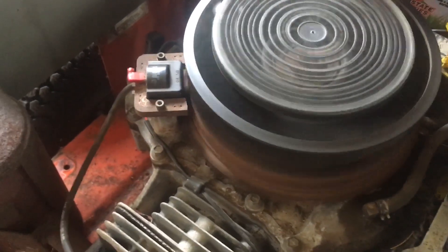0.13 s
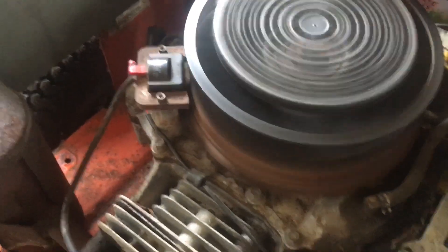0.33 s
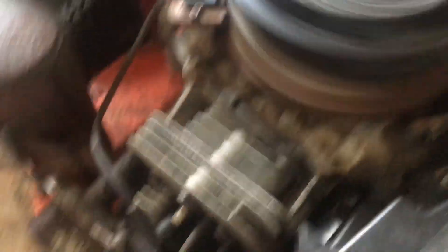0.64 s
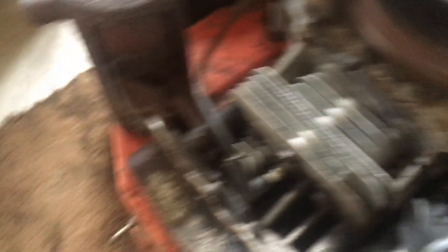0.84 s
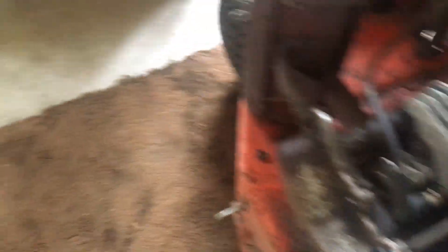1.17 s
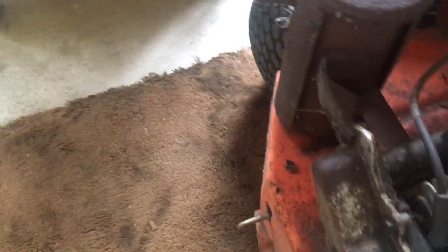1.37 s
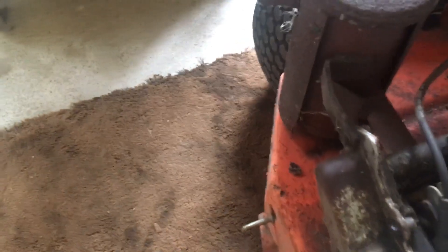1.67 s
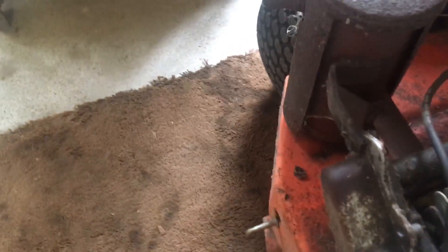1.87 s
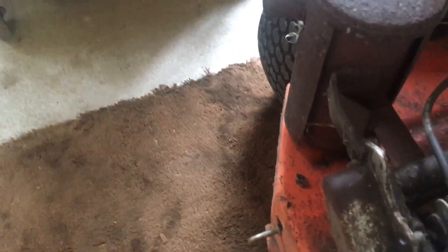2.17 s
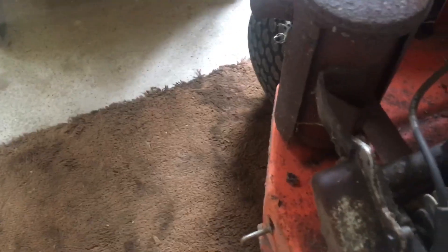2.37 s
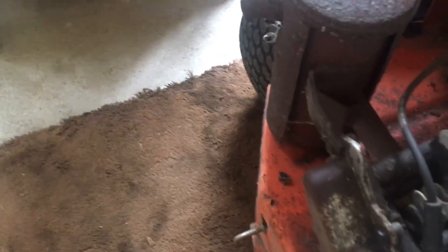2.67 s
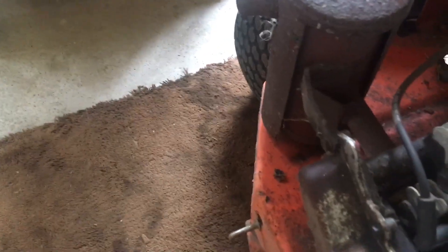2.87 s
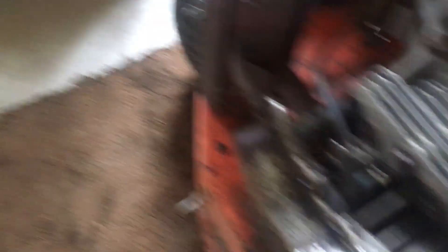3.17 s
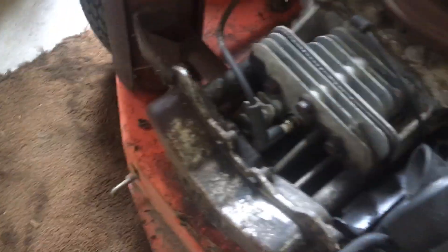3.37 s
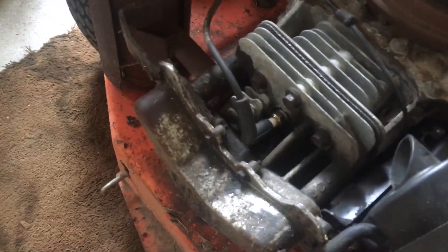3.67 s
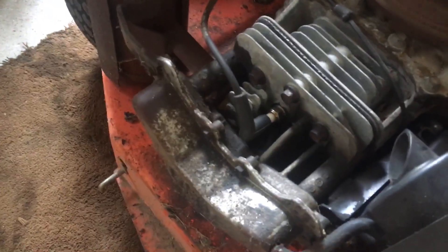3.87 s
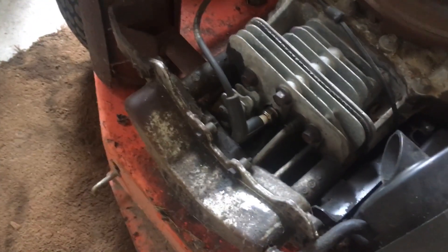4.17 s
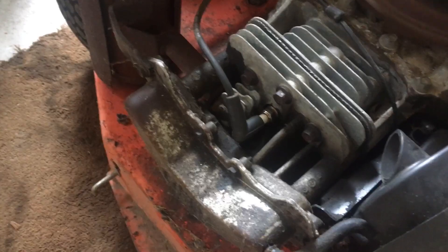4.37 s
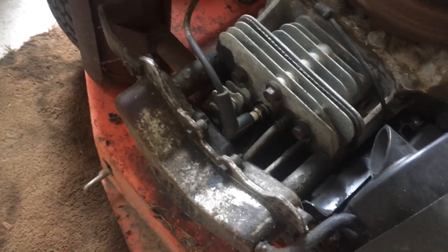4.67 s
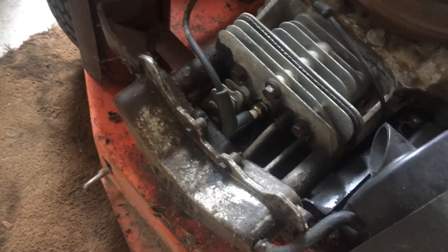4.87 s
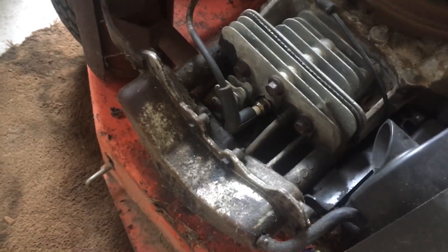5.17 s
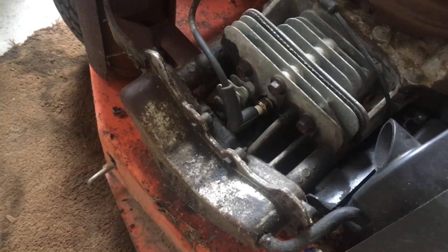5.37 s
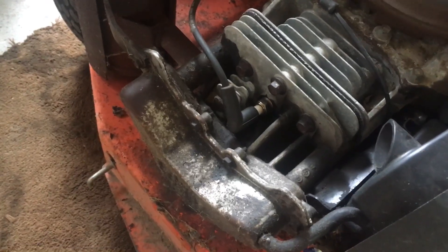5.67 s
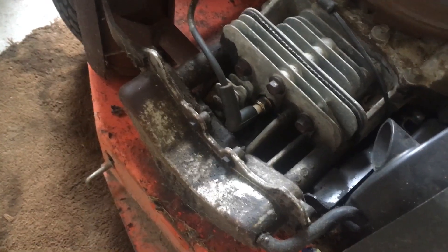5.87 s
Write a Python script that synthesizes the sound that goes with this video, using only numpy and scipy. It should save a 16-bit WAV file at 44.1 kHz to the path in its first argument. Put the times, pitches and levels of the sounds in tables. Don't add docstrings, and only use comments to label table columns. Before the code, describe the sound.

Steady cranking already under way and continuing to the end: a harsh nasal gear whine with loose metallic rattle, lurching in a fast even chug. Each cycle brings a slowing groan, a valve clack, a deep soft muffler thud and a small intake pop. The pace slackens very slightly as the battery tires. Heard very close on a handheld microphone in a dry space, with no ignition and no voices.

```python
import sys
import numpy as np
from scipy import signal
from scipy.fft import rfft, irfft
from scipy.io import wavfile
from scipy.ndimage import uniform_filter1d

SR = 44100
rng = np.random.default_rng(int(sys.argv[2]) if len(sys.argv) > 2 else 0)


def boost(x):
    u = np.asarray(x, float) / 20
    return 10 ** u


def wav_record(signal):
    frames = np.transpose(np.atleast_2d(signal))
    bounded = np.clip(frames, -1, 1)
    quanta = np.round(bounded * 32767).astype(np.int16)
    wavfile.write(sys.argv[1], SR, quanta)


N = 265129
TIME, HZ = np.arange(N) / SR, np.fft.rfftfreq(N, 1 / SR)

RING_TEETH, PINION_TEETH = 97, 14
CYCLE_MS = 222.3
TOP_MS = 180
BEAT_CYCLES = 7.6

# time_s, cycle_ms
PACE = [(0, 220.66), (2.946, 222.65), (3.76, 222.33), (6.1, 223.89)]
# time_s, nearness to the flywheel (0-1)
NEARNESS = [(0, 0.75), (.75, 0.72), (.95, 0.25), (1.2, 0.25), (2.7, 0.19), (3.2, 0.3), (3.6, 0.39),
            (6.1, 0.45)]
# multiple of the tooth rate, level_db, share of the load, near_flywheel_db,
# unsteadiness_db, gain_as_speed_halves_db
WHINE_TONES = [(1, -32, 0.25, -3.5, 2, -23), (2, -24, 0.51, -7, 1, -5.5), (3, -35.5, 0.15, 7, 1, -2),
               (4, -40.5, 0.067, 8, 5, -10), (5, -48.5, 0.15, 13, 8.5, -27)]
# time_in_cycle_ms,
# length_ms, level_db
SLACK_TEETH = [(192, 5.5, -19), (168, 2.8, -12), (148.4, 3.7, -8), (60, 2.5, -2), (109, 17, -10),
               (4, 4.7, -10)]
# time_in_cycle_ms, length_ms, level_db
RING_GEAR_SPOTS = [(5, 4.5, -3.5), (108, 12.5, 0), (155.3, 9.4, -4), (204.4, 3.7, 0.5)]
# pitch_hz, width_hz, level_db,
# loss_as_speed_halves_db, near_flywheel_db
HOUSING_RINGS = [(1510, 80, -15, -11, 8), (2210, 135, -7, -17, -6.5), (2581, 98, -6.5, 8.5, 7.5),
                 (2960, 260, -1.5, 67, -3), (3500, 42, -10.5, 6.5, 15), (3895, 40, -19.5, 15, 28),
                 (4630, 310, -19.5, -3, 25), (5480, 26, -6, 16, -5), (5830, 66, -6.5, 23, 0),
                 (5888, 79, 2, 6, -7), (6040, 440, 6, 6, -15.5), (6492, 100, 4, 11.5, -3),
                 (7433, 260, 2.5, 14.5, -0.5), (8800, 100, -5.5, 14, 10.5), (8940, 190, -0.5, 10, -4),
                 (9380, 220, 2.5, 14.5, -0.8), (9720, 17, -15.5, 47, 10.5), (11550, 240, -11, 25, 14.5),
                 (11500, 230, -14, 9, 3), (12400, 130, -16, -5, -4), (14800, 170, -16, 14, 0),
                 (15050, 76, -23, 11, .1)]
# pitch_hz, level_db (per Hz)
SCRAPE_COLOUR = [(260, -9), (430, -11), (900, -6.5), (1330, -11.5), (1750, -1.5), (2070, -3), (3300, -6.5),
                 (4950, -11.5), (5740, -16), (9090, -6.5), (10400, -20), (11700, -11.5), (15600, -17)]
# clack_db, rocker_ring_db, pushrod_ring_db
VALVE_LANDINGS = [(-2, 3, 3), (0, 6, -12), (0, 0, 1.5), (2, -5, 2.5), (0, -1, -6), (1, 3, -1.5),
                  (-1, -8, 3.5), (-0.1, 3.5, -1), (2.7, -5, 1.5), (-0.5, 2, 0), (0.5, -1, 4.5),
                  (0.5, -5, 6.5), (-1, -2, -4), (0, -5, -5), (2.5, -2, -2), (1.5, -6, 3), (2.5, 9, -1),
                  (0.5, 8, -4), (-0.5, -7, -3), (0, 2.5, -3), (1.5, 9, 1), (0.5, 0, 0.5), (1.5, 8.5, 0),
                  (2, 0, -2), (0, 7, 1), (2, 5.5, 4), (1, 1, 0), (1, 7, -5)]
# pitch_hz, level_db (per Hz)
CLACK_COLOUR = [(290, -47), (500, -4.5), (1780, 0.5), (3000, -1.5), (5000, -4), (7930, -15), (9000, 3),
                (10500, -2.5), (12500, 1), (15700, -18)]
# time_in_cycle_ms, muffler push, intake push
AIR_PUFFS = [(3.44, 0.34, 0), (43.66, 1.59, 0), (59.88, -0.27, 0.18), (66.29, 3.26, 0.43),
             (72.53, -1.44, 0.64), (111.12, 0.97, 0.07), (130.68, 0.33, 0.32), (146.79, 0.64, 0.11),
             (167.62, -0.34, 0)]
# pitch_hz, width_hz, level_db
MUFFLER_RINGS = [(81.7, 9.6, 0), (103.5, 17.7, -5.2)]
# pitch_hz, width_hz, level_db
INTAKE_RINGS = [(241, 46, 4.6), (290, 31, 0), (355, 50, -4)]
# pitch_hz, width_hz, level_db
PORT_DIPS = [(2140, 123, -5), (4820, 260, -6), (6700, 205, -7), (10470, 330, -6.5), (13700, 530, 1),
             (14500, 200, 1)]


def evened(x):
    return x / np.sqrt(np.mean(x ** 2) + 1e-20)


def modes(rows):
    return sum(boost(db) * 1j * HZ * width / (hz ** 2 - HZ ** 2 + 1j * HZ * width) for hz, width, db in rows)


def through(x, response):
    return irfft(rfft(x) * response, N)


def coloured(x, points):
    hz, db = np.transpose(points)
    return evened(through(x, boost(np.interp(np.log(HZ + 1), np.log(hz), db))))


def chance(hz):
    return evened(through(rng.standard_normal(N), np.exp(-(HZ / hz) ** 2)))


def burst(ms, at_ms, rise_ms, fall_ms):
    rise = np.exp(-((ms - at_ms) / rise_ms) ** 2)
    fall = np.exp(-abs(ms - at_ms) / fall_ms)
    return np.where(ms < at_ms, rise, fall)


def dips(ms, rows):
    return sum(db * np.exp(-((ms - at_ms) / length_ms) ** 2) for at_ms, length_ms, db in rows)


def beat(cycle, peak_cycle):
    return np.cos(2 * np.pi * (cycle - peak_cycle) / BEAT_CYCLES)


def nearness():
    return np.interp(TIME, *np.transpose(NEARNESS))


def crank():
    cycle_ms = np.interp(TIME, *np.transpose(PACE))
    cycle = .6693 + np.cumsum(1000 / cycle_ms) / SR
    ms = cycle % 1 * CYCLE_MS
    grid = np.linspace(0, CYCLE_MS, num=2000)
    turn_swing = 20 * np.cos(2 * np.pi * (grid - 35) * 2 / CYCLE_MS)
    cycle_swing = 12 * np.cos(2 * np.pi * grid / CYCLE_MS)
    from_top = (grid - TOP_MS) / np.where(grid < TOP_MS, 20, 16.5)
    sag = 341 * np.exp(-abs(from_top) ** 3)
    rate = 922 + turn_swing + cycle_swing - sag
    angle = np.floor(cycle) + np.interp(ms, grid, np.cumsum(rate) / rate.sum())
    speed = np.interp(ms, grid, rate / rate.max())
    return cycle.astype(int), ms, speed, 2 * RING_TEETH * angle


def whine(cycle, ms, speed, teeth):
    turns = teeth / PINION_TEETH
    near = nearness()
    load_db = 2.5 + dips(ms, SLACK_TEETH) + 4.1 * np.cos(2 * np.pi * (turns - .15))
    strain = -np.log2(speed) * burst(ms, 173, 30, 24)
    wobble = .017 * chance(hz=50) + .025 * np.sin(2 * np.pi * turns)
    judder = .06 * strain * np.sin(2 * np.pi * teeth / 4.7)
    wobble = wobble * (1 + 1.5 * near) + judder
    tones = np.zeros(N)
    for multiple, db, share, near_db, rough_db, strain_db in WHINE_TONES:
        tone_db = db + share * load_db + near_db * near + rough_db * chance(hz=40) + strain_db * strain
        tones += boost(tone_db) * np.cos(2 * np.pi * multiple * (teeth + wobble))
    groan = boost(-21 + beat(cycle, 6.8)) * burst(ms, 176.7, 10.0, 4.2)
    groan = groan * np.cos(2 * np.pi * (teeth + wobble + 0.089 * chance(hz=120)))
    shroud = through(groan, modes([(566, 18, 8.4)]))
    return np.sqrt(2) * tones + groan + shroud


def rattle(ms, speed, teeth):
    turn = 2 * np.pi * teeth / PINION_TEETH
    pinion_db = 2.6 * np.cos(turn - 1.1) + .7 * np.cos(2 * turn)
    luck_db = 1.5 * rng.exponential(size=int(teeth.max()) + 1)
    tooth_db = uniform_filter1d(luck_db[teeth.astype(int)], size=90)
    force = boost(pinion_db + dips(ms, RING_GEAR_SPOTS) + np.minimum(tooth_db, 8) + 0.55 * chance(hz=70.6))
    slowing, near = np.log2(speed), nearness()
    rings = np.zeros(N)
    for hz, width, db, lost_db, near_db in HOUSING_RINGS:
        gain = boost(lost_db * slowing + near_db * near + 3.45 * chance(hz=56.0))
        strikes = force * gain * rng.standard_normal(N)
        rings += through(strikes, modes([(hz, width, db)]) / np.sqrt(width))
    scrape = coloured(force * rng.standard_normal(N), SCRAPE_COLOUR)
    dull = through(scrape, 1 / (1 + (HZ / 3300) ** 4))
    bright = scrape - dull
    scrape = dull * boost(2.3 * slowing) + bright * boost(20.4 * slowing + 0.93 * near)
    return boost(-17) * evened(rings) + boost(-21) * scrape


def landing(cycle, column):
    return boost(np.array(VALVE_LANDINGS)[cycle, column])


def valves(cycle, ms):
    grit = boost(1.2 * chance(hz=300)) * rng.standard_normal((2, N))
    first = burst(ms, 30.7, 1.7, 12.2) + .6 * burst(ms, 30.4, .3, 1.2)
    clack = landing(cycle, column=0) ** 1.7 * first + 0.5 * burst(ms, 56.2, 1.9, 5.2)
    clank_db = -15 + 2 * TIME + 4.5 * beat(cycle, 4.2)
    clack = clack + boost(clank_db) * burst(ms, 203, 0.71, 4.3)
    head = modes([(410, 39, -0.61), (554, 67, 0.84), (1260, 80, 0.84), (1440, 56, 0.17)])
    knock = through(clack * grit[1], head)
    rocker = landing(cycle, column=1) ** 1.1 * burst(ms, 33.6, 0.67, 8.0)
    rocker = rocker * np.cos(2 * np.pi * 4425 * TIME + 0.27 * chance(hz=90))
    pushrod = landing(cycle, column=2) ** 1.24 * burst(ms, 53.5, 6.4, 18.4)
    pushrod = pushrod * np.cos(2 * np.pi * 2765 * TIME + .5 * chance(hz=60))
    struck = boost(-25.5) * coloured(clack * grit[0], CLACK_COLOUR) + boost(-35.5) * evened(knock)
    return struck + boost(-29.5) * evened(rocker) + boost(-31.5) * evened(pushrod)


def air(ms):
    pushes = np.zeros((2, N))
    for at_ms, *push in AIR_PUFFS:
        starts = np.diff((ms >= at_ms) * 1.) > 0
        pushes[:, 1:] += np.outer(push, starts) * SR / 1000
    pushes *= boost(-1.2 * np.exp(-TIME / 2.1))
    soft = np.exp(-(2 * np.pi * HZ * .0005) ** 2 / 2)
    thud = through(pushes[0], soft * modes(MUFFLER_RINGS))
    pop = through(pushes[1], soft * modes(INTAKE_RINGS))
    body = modes([(48, 15, -2), (120, 40, 0), (330, 80, -6)])
    rumble = evened(through(rng.standard_normal(N), body ** 2))
    return boost(0.86) * thud + boost(2.0) * pop + boost(-45) * rumble


def shed(x):
    t = np.arange(SR // 10) / SR
    tail = rng.standard_normal(len(t)) * boost(-60 * t / .06) * (t > .002)
    return signal.fftconvolve(x, tail / np.linalg.norm(tail))[:N]


def scene():
    cycle, ms, speed, teeth = crank()
    metal = whine(cycle, ms, speed, teeth) + rattle(ms, speed, teeth) + valves(cycle, ms)
    echo = boost(-17) * shed(metal)
    return (air(ms) + boost(-0.08) * metal + echo)[None]


def roll_off(x):
    return signal.sosfilt(signal.butter(12, 15760, fs=SR, output="sos"), x)


def record(dry):
    port = boost(dips(HZ, PORT_DIPS))
    low_cut = HZ ** 2 / (HZ ** 2 + 26 ** 2)
    high_cut = 1 / (1 + (HZ / 15750) ** 300)
    heard = through(dry, port * low_cut * high_cut)
    squeezed = heard / (1 + (heard / .93) ** 6) ** (1 / 6)
    return roll_off(squeezed)


dry = scene()
out = record(dry)
wav_record(out)
```